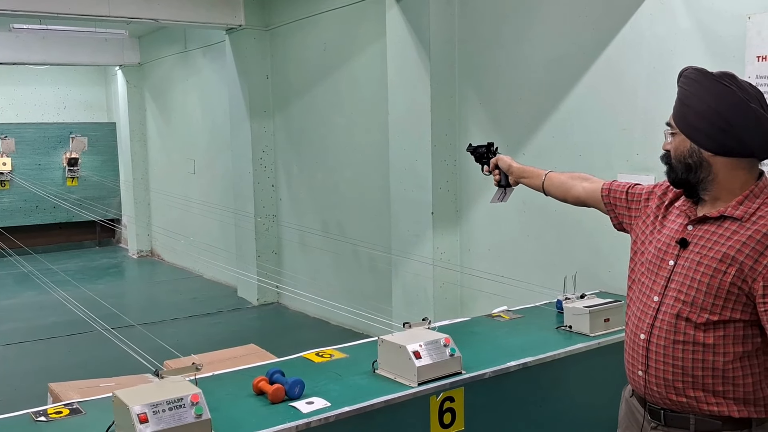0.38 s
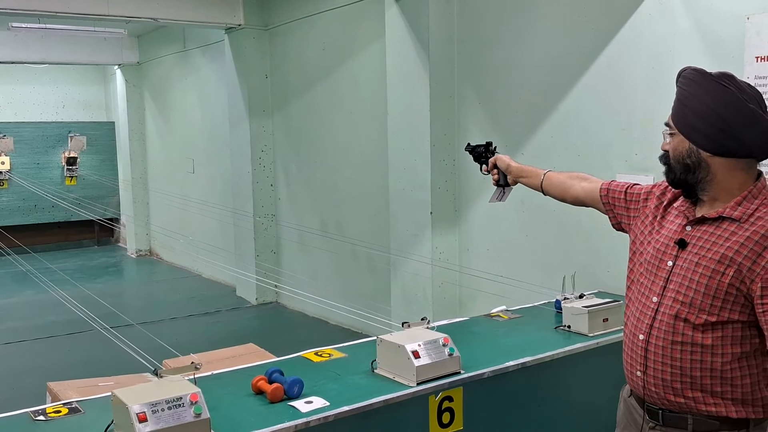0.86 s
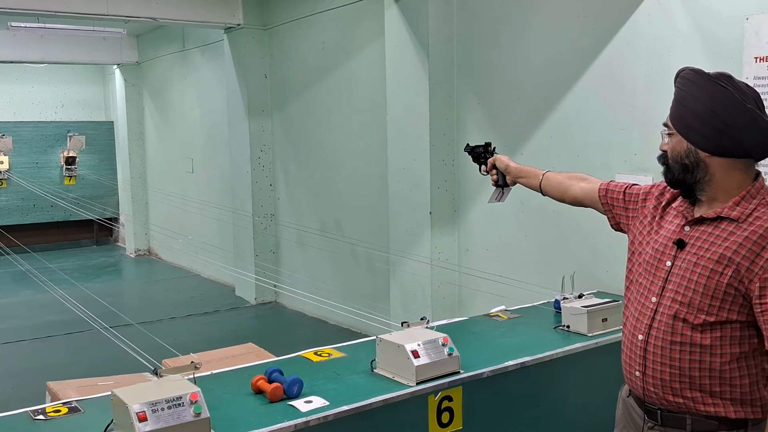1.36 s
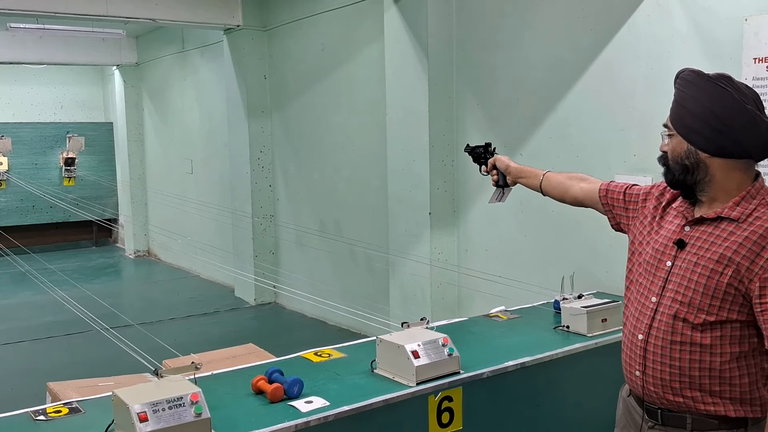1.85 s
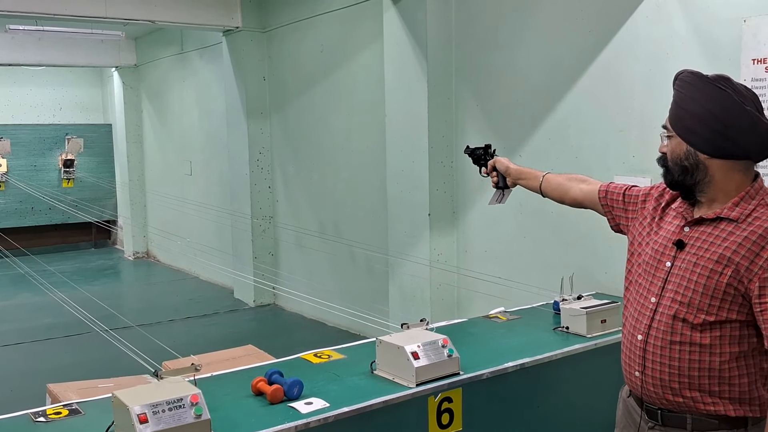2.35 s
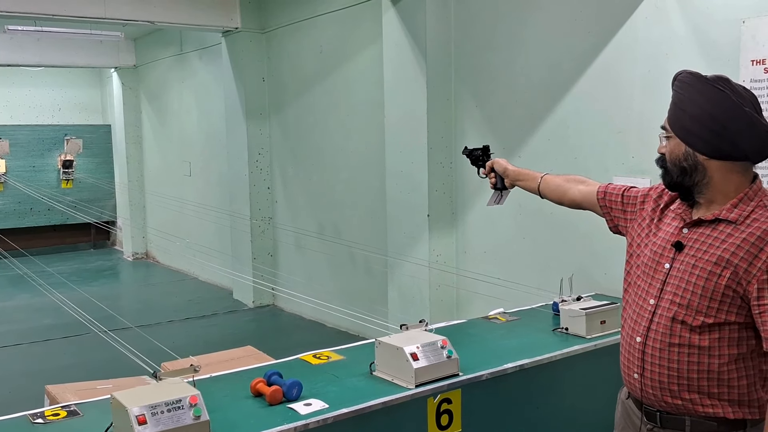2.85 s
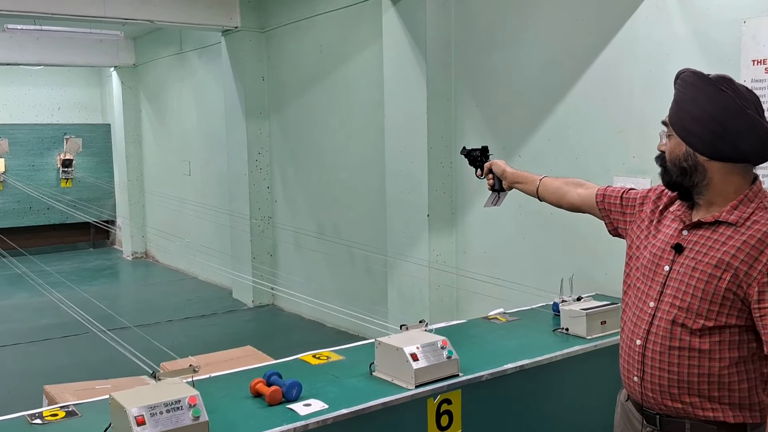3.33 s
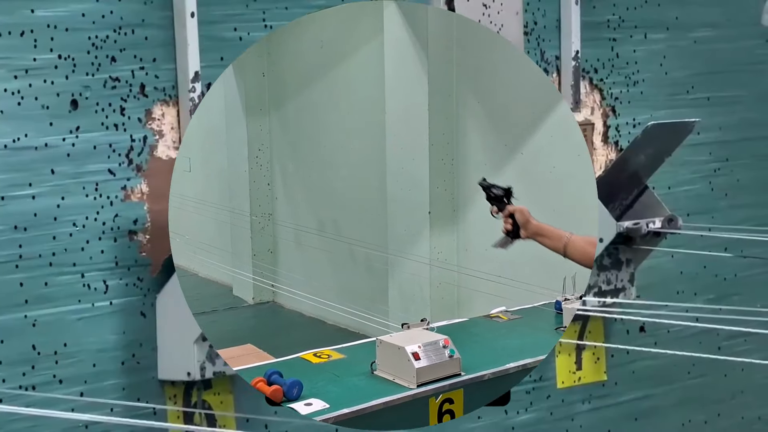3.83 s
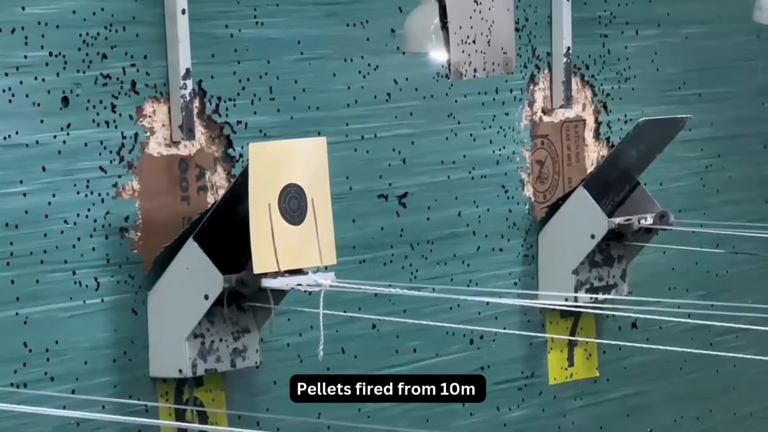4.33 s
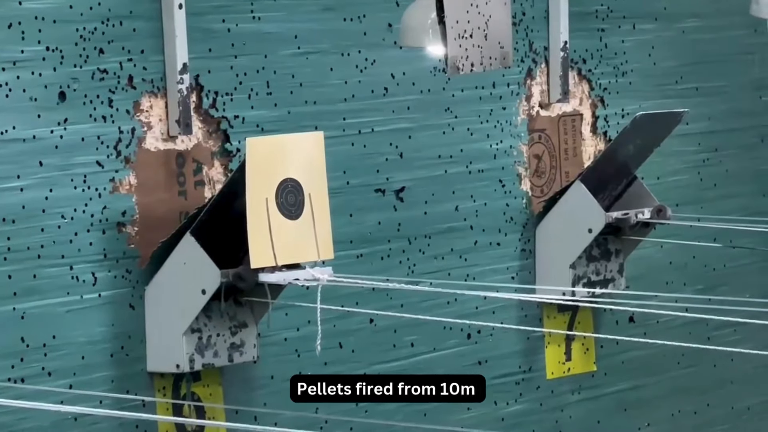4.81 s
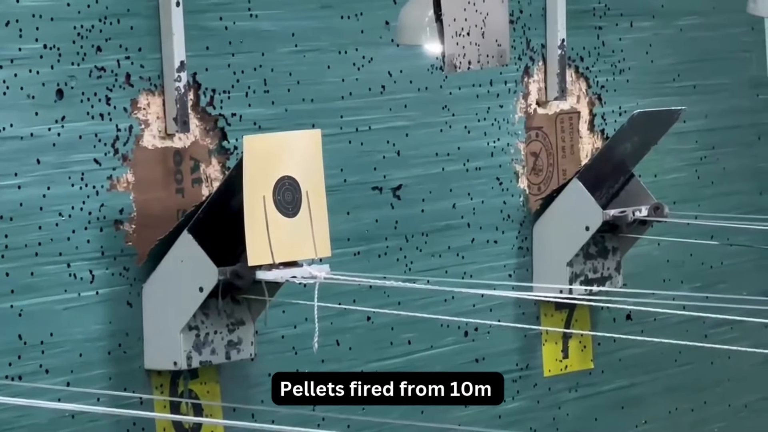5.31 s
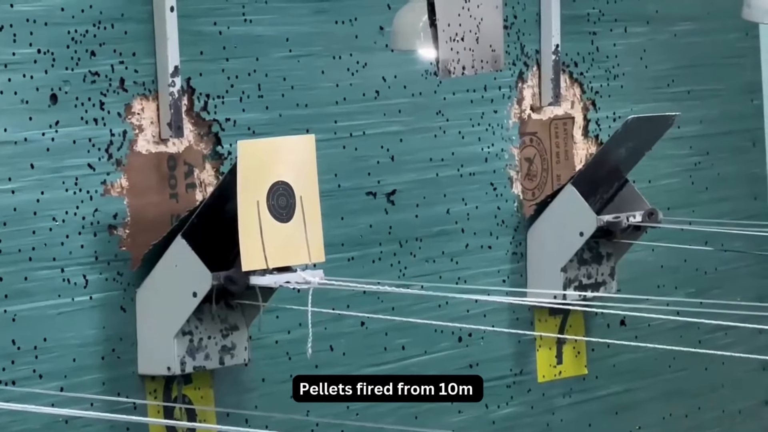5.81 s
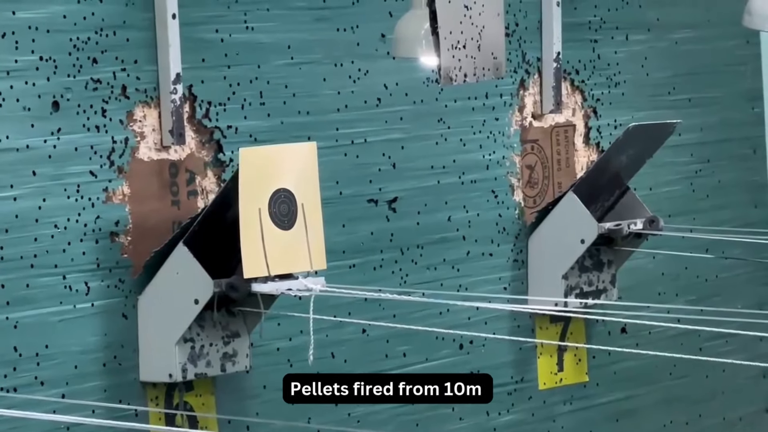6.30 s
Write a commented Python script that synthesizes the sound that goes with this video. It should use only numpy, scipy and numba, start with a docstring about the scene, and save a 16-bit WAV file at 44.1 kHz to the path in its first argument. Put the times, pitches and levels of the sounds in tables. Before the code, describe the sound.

Close at a shooter's chest in a bare indoor range, quiet low ventilation air and tiny metallic cocking clicks come first. After a pause, a sharp loud gas shot cracks, with tight hard echoes, a steel trap ringing and a hall tail dying away, and a small click within it. The sound cross-fades to duller, quieter stereo air near the targets, with barely audible rustles and a faint bump, cut off just as another shot begins.

```python
"""Indoor pellet range

First, one microphone on the shooter's chest: cocking clicks, then a gas shot (a push of air plus hiss) with
hard echoes held flat by a limiter. The pellet rings the steel trap and the hall dies away as fading noise.
Then a cross-fade to a stereo phone by the targets: duller air made of filtered noise, faint rustles, a distant
bump and the start of the next shot."""
import sys
import numpy as np
from scipy import signal
from scipy.fft import rfft, irfft
from scipy.io import wavfile
from scipy.ndimage import uniform_filter1d
from numba import njit

SR = 44100
rng = np.random.default_rng(int(sys.argv[2]) if len(sys.argv) > 2 else 0)


def volts(x):
    """Linear amplitude factor 10**(x/20) for a level x in dB, scalar or array-like."""
    e = np.asarray(x, float) / 20
    return 10 ** e


def digitize_waveform(pressure):
    """Quantize a signal to 16-bit integers and store it at the path in sys.argv[1].

    Rows of a 2-D input are taken as channels; values are limited to [-1, 1].
    """
    field = np.atleast_2d(pressure).T
    bounded = np.clip(field, -1, 1)
    quanta = np.round(bounded * 32767).astype(np.int16)
    wavfile.write(sys.argv[1], SR, quanta)


N = 294256
TIME = np.arange(N) / SR
HALL_LENGTH = int(2.5 * SR)  # samples
SOUND_M_S = 343  # speed of sound
SHOT_S, SHOT_DB = 2.5561, 3.5  # time of the shot, level of its blasts

# surfaces near the shooter (bench, boxes, floor, ceiling):
# (extra path [m], level [dB], hiss share [0-1])
NEAR_SURFACES = [(.58, 5.5, 0.4), (1.47, -3, 0.3), (2.4, 1.5, .8), (4.05, -1.5, 0.79)]


def colour(x, points):
    """Filter through (frequency [Hz], gain [dB]) points without any sound ahead of the input."""
    hz, db = np.transpose(points)
    log_gain = np.interp(np.log(np.linspace(1, SR / 2, 2049)), np.log(hz), db) * np.log(10) / 20
    # minimum phase: fold the second half of the cepstrum onto the first
    cepstrum = irfft(log_gain)
    cepstrum[1:2048] *= 2
    cepstrum[2049:] = 0
    response = irfft(np.exp(rfft(cepstrum)))
    return signal.fftconvolve(x, response)[:len(x)]


def band(x, lo_hz, hi_hz):
    """Keep what lies between two frequencies."""
    edges = [lo_hz, min(hi_hz, .45 * SR)]
    return signal.sosfilt(signal.butter(2, edges, "band", fs=SR, output="sos"), x)


def cut(x, top_hz):
    """Steep low-pass."""
    return signal.sosfilt(signal.ellip(8, .2, 60, top_hz, fs=SR, output="sos"), x)


def level(x, db):
    """Scale to an rms (average) level."""
    return x * volts(db) / np.sqrt(np.mean(x ** 2))


def add(out, s, x):
    """Mix x into out from time s."""
    i = int(round(s * SR))
    out[i:i + len(x)] += x[:len(out) - i]


def walk(rate):
    """Slow random drift with an rms size of 1; rate is how many new random values come per second."""
    k = int(SR / rate)
    steps = np.repeat(rng.standard_normal(N // k + 1), k)
    smooth = uniform_filter1d(uniform_filter1d(steps, k), k)
    return level(smooth[:N], 0)


def fade(t, t60):
    """Exponential decay that falls 60 dB in t60 seconds."""
    return np.exp(-np.log(1000) * t / t60)


def blast(hiss):
    """Muzzle blast: a dip, a sharp push of gas that swings back, and a puff of jet hiss scattered by the bench."""
    t = TIME[:300]
    dip = np.exp(-((t - .0004) / .00007) ** 2)
    push = (t > .0005) * np.cos(2 * np.pi * 600 * (t - .0006)) * np.exp(-t / 0.0011)
    puff = band(rng.standard_normal(len(t)), 2493, 15500)
    puff = puff * np.minimum(t / 0.00037, 1) * np.exp(-t / 0.0014)
    pressure = band((1 - hiss) * (1.2 * push - 1.56 * dip), 149.3, 16000)
    return pressure + 0.81 * hiss * puff


def echoes():
    """Every hard arrival of the blast: direct, off near surfaces, and to and fro between the side walls."""
    # straight to the microphone, which sits behind the muzzle: (level [dB], hiss share [0-1])
    direct = -4, 0.94
    rows = [(0.008, *direct)] + NEAR_SURFACES
    round_m, first_db, loss_db, hiss = 5.3, 6.5, 2, .45  # path and loss are for each round
    copy_m, copy_db = .8, -3  # the bench's copy comes this much later and weaker
    for k in (1, 2, 3):
        db = first_db - loss_db * (k - 1)
        rows += [(k * round_m, db, hiss), (k * round_m + copy_m, db + copy_db, hiss)]
    return rows


def slaps():
    """Scattered hard copies of the blast, as off pillars and beams, that roughen the hall tail."""
    # settings: rate [per second], level [dB], size spread [dB], 60 dB fall time [s]
    rate, db, spread_db, t60 = 704, -15, 3, 0.95
    t = TIME[:int(1.5 * SR)]
    when, size, sign = rng.random((len(t), 3)).T
    strength = volts(db - spread_db * np.log(1 - size)) * np.sign(sign - .5)
    train = (when < rate / SR) * strength
    train = train * fade(t, t60) * (1 - np.exp(-t / .03))
    return signal.fftconvolve(train, band(blast(0.22), 700, 9000))


def hall(build_s):
    """Diffuse hall response: dense reflections that build up, each third of an octave dying at its own rate."""
    # hall decay: (frequency [Hz], 60 dB fall time [s])
    decay = [(60, 2.3), (160, 1.52), (420, 2.14), (1100, 1.004), (2900, 1.27), (6000, 1.173), (10000, 0.7),
             (16000, 0.7)]
    hz, t60 = np.transpose(decay)
    t = TIME[:HALL_LENGTH]
    spectrum = rfft(rng.standard_normal(len(t)))
    octave = np.log2(np.linspace(1, SR / 2, len(t) // 2 + 1))
    out = 0
    for centre in np.arange(15, 44) / 3:
        # triangular slices that overlap and add up to the whole
        share = np.clip(1 - 3 * abs(octave - centre), 0, 1)
        out = out + irfft(spectrum * share, len(t)) * fade(t, np.interp(centre, np.log2(hz), t60))
    return out * (1 - np.exp(-t / build_s))


def ring(modes, blur_hz):
    """Ringing steel or hall air; each mode is narrow noise, wavering as its reflections beat against it."""
    t = TIME[:2 * SR]
    out = 0
    for hz, db, t60 in modes:
        # reversed: at full swing from the first moment
        beat = band(rng.standard_normal(len(t)), hz - blur_hz, hz + blur_hz)[::-1]
        out = out + volts(db) * fade(t, t60) * level(beat, -2.3)
    return out


def shot_tail():
    """The diffuse hall answer to the shot, scaled by its early part."""
    # colour of the shot in the hall: (frequency [Hz], gain [dB])
    tail_colour = [(29, -63.5), (55, -29.5), (95, -28), (125, -15), (223, -12), (371, -10.5), (507, -10),
                   (863, -2), (1500, -6.5), (1900, -7.5), (2440, -8), (3700, -9), (5270, -14.5),
                   (8000, -14.5), (13000, -10.5), (16000, -19.5)]
    tail = colour(hall(build_s=0.041), tail_colour)
    return volts(-7.5) * tail / np.std(tail[1000:6000])


def trap():
    """The pellet sets the steel trap ringing; the ring swells in quickly and each mode dies at its own rate."""
    # steel trap modes: (frequency [Hz], level [dB], 60 dB fall time [s])
    steel = [(609.7, 0, 1.4), (739, -2.5, 1.6), (955, 0, 1.1), (1671, 0, 1.1), (2250, -1, 1.3),
             (2410, -7.5, 0.56), (2450, 2, 1.15), (2700, -5, 0.71), (3000, -8.5, 1.1), (3510, -4.5, .8),
             (5140, -7, 1.0), (7000, -10, .9), (8027, -6, 0.82)]
    return volts(-20.5) * ring(steel, blur_hz=17) * (1 - np.exp(-TIME[:2 * SR] / 0.015))


def standing_waves():
    """The shot excites tones of the hall air, which build up and then die away."""
    # standing waves of the hall: (frequency [Hz], level [dB], 60 dB fall time [s])
    tones = [(122, -6, 2.2), (150.8, -8.5, 2.2), (196.1, -3.5, 2.4), (264, 1, 2), (333, -3, 2.2),
             (444.3, -1, 2.4), (481.3, -1.5, 2.2), (552, -3, 2.4), (675, -2.5, 1.6)]
    return volts(-22) * ring(tones, blur_hz=5) * (1 - np.exp(-TIME[:2 * SR] / .03))


def shot():
    """Muzzle blast, its first echoes, the hall behind it and the pellet on the trap."""
    out = np.zeros(N)
    for path, db, hiss in echoes():
        add(out, SHOT_S + path / SOUND_M_S, volts(SHOT_DB + db) * blast(np.clip(hiss, 0, 1)))
    add(out, SHOT_S, shot_tail())
    add(out, SHOT_S, volts(SHOT_DB) * slaps())
    add(out, 2.66, trap())
    add(out, SHOT_S, standing_waves())
    return out


def mechanism():
    """Hammer, sear and trigger tick as knocks and noise snaps; a spring rings; near surfaces answer in the treble."""
    # clicks: (time [s], relative level [dB], bright share [0-1])
    clicks = [(.2775, -39, .9), (0.2847, -30, 0.5), (.339, -37, .8), (2.5482, -35, .6),
              (3.2306, -18.5, 0.49)]
    # the gun frame knocked: (frequency [Hz], level [dB])
    frame = [(3300, -9), (4350, 1.5), (5900, -6)]
    # steel spring let go as the hammer is cocked: (frequency [Hz], level [dB], 60 dB fall time [s])
    spring = [(10450, -3.5, 0.58), (10540, -4.5, 0.17), (15290, -23, .25)]
    # floor and ceiling send back the treble of each click: one level [dB] each
    click_echo_db = -3.5, -9
    out, snaps = np.zeros((2, N))
    lead_s = .002  # the knock is centred this long after its first sample
    t = TIME[:180] - lead_s
    knock = 0
    for hz, db in frame:
        knock = knock + volts(db) * np.sin(2 * np.pi * hz * t) * np.exp(-(t * hz / 4.4) ** 2)
    for s, db, bright in clicks:
        snap = band(rng.standard_normal(len(t)), 2200, 14000) * np.exp(-(t / 0.00056) ** 2)
        add(out, s - lead_s, volts(db) * (1 - bright) * knock)
        add(snaps, s - lead_s, volts(db) * bright * level(snap, -9))
    treble = band(snaps, 10000, 16000)
    for (path, _, _), db in zip(NEAR_SURFACES[2:], click_echo_db):
        add(out, path / SOUND_M_S, volts(db) * treble)
    add(out, .2768, volts(-42.5) * ring(spring, blur_hz=45))
    walls = band(hall(build_s=.004), 7500, 17000) * fade(TIME[:HALL_LENGTH], 0.98)
    return out + snaps + volts(-29.5) * signal.fftconvolve(snaps, walls)[:N]


@njit
def limiter(x, top, attack, release, ceiling):
    """Gain falls fast while the level is over top and recovers slowly; what slips through clips softly."""
    y, envelope = np.zeros(len(x)), top
    for i in range(len(x)):
        target = max(abs(x[i]), top)
        envelope += (target - envelope) * (attack if target > envelope else release)
        v = x[i] * top / envelope / ceiling
        y[i] = ceiling * v / (1 + v ** 4) ** .25
    return y


def hum():
    """A low steady tone whose level drifts."""
    return volts(-64.5 + 4 * walk(6)) * np.sin(2 * np.pi * 104.5 * TIME)


def lapel():
    """The mono microphone at the shooter's chest, with its limiter."""
    # hall air at the lapel: (frequency [Hz], gain [dB])
    air_colour = [(15, -30), (25, -3), (48, -1.5), (70, -8.5), (99, -1), (161, -6.5), (236, -2.5),
                  (285, -8), (394, -4), (463, -4.5), (887, -4.5), (1250, -9), (1750, -12.5), (3000, -20),
                  (8830, -36), (16000, -47)]
    heard = air(air_colour, -45, .6 * walk(8.1)) + hum() + mechanism() + shot()
    # attack 1.5 ms, release 33 ms
    return limiter(heard, 0.75, 1 / (0.0015 * SR), 1 / (0.033 * SR), 0.93)


def next_shot():
    """Each arrival of the next shot is a short ringing pulse at each port's pitch, softened ahead of its peak."""
    # arrivals: (time of peak [s], level [dB], left minus right [dB])
    arrivals = [(6.6573, -10, -4.5), (6.6600, -13, -4), (6.6657, -12.5, -1), (6.671, -13, -9)]
    # pulse of each port, left then right: (frequency [Hz], softening ahead of the peak [s], fall time [s])
    port_pulses = [(1300, 0.00064, 0.0013), (1510, 0.0021, .0008)]
    out = np.zeros((2, N))
    lead_s = .01  # room for the softening ahead of each peak
    t = TIME[:800] - lead_s
    for port, sign, (hz, softening, fall) in zip(out, (1, -1), port_pulses):
        envelope = np.exp(-np.where(t < 0, -t / softening, t / fall))
        pulse = envelope * np.cos(2 * np.pi * hz * t)
        for s, db, pan_db in arrivals:
            add(port, s - lead_s, volts(db + sign * pan_db / 2) * pulse)
    return out


def add_wash(mid, side):
    """Mix in the wash of dense reflections behind the next shot, coloured apart for mid and side."""
    # colour of the middle of the wash: (frequency [Hz], gain [dB])
    mid_colour = [(47, -39.5), (80, -6.5), (170, -3.5), (400, -12), (1000, -10.5), (1510, -4.5),
                  (5140, -14.5), (7420, -22), (9480, -17.5), (10500, -31.5), (13600, -59), (22000, -120)]
    # colour of its left-right difference: (frequency [Hz], gain [dB])
    side_colour = [(88, -52), (150, -22.5), (1170, -4), (3260, -22), (3850, -44.5), (5660, -50),
                   (7590, -17.5), (12000, -30), (15600, -59.5), (22000, -120)]
    for part, points, db in (mid, mid_colour, -18.5), (side, side_colour, -19.5):
        add(part, 6.6558, level(colour(hall(build_s=0.00062)[:800], points), db))


def bump():
    """A dull bump far off: a low band of the hall's fading noise."""
    thud = band(hall(build_s=0.015), 247, 470) * fade(TIME[:HALL_LENGTH], 2.818)
    return level(thud, -63)


def rustle():
    """Faint rustles by the targets: noise that swells and sinks."""
    # rustles: (time of peak [s], level [dB], length to each side [s])
    rustles = [(5.0, -76, .07), (5.55, -76.5, .25)]
    out = np.zeros(N)
    for s, db, length in rustles:
        noise = level(band(rng.standard_normal(N), 1500, 4905), 0)
        out += volts(db) * noise * np.exp(-((TIME - s) / length) ** 2)
    return out


def phone():
    """Two ports by the targets: mid and side add in the left, subtract in the right; the next shot joins each."""
    # bass below 130 Hz, only its changes count: (time [s], level [dB])
    rumble = [(4.0, -59.5), (5.1, -61), (5.5, -57.5), (5.9, -57), (6.4, -62), (6.62, -57)]
    # air in the middle: (frequency [Hz], gain [dB])
    mid_colour = [(13, -32), (22, -10), (49, 1), (147, -5.5), (211, -5.5), (281, -11), (461, -12.5),
                  (1120, -21), (1690, -22.5), (3160, -36.5), (5310, -44), (7450, -60), (11000, -54),
                  (14300, -97), (22000, -120)]
    # air in the left-right difference: (frequency [Hz], gain [dB])
    side_colour = [(24, -44), (40, -13), (195, -3.5), (977, -7), (1540, -5.5), (3030, -34.5), (3980, -48),
                   (6550, -58), (7510, -34), (9000, -63), (11700, -91), (19800, -120)]
    rumble_db = np.interp(TIME, *np.transpose(rumble))
    rumble_db = rumble_db - rumble_db[N // 2:].mean()
    mid = air(mid_colour, -52.5, rumble_db) + rustle()
    side = air(side_colour, -61.5, rumble_db)
    add(mid, 5.03, bump())
    add_wash(mid, side)
    return np.array([mid + side, mid - side]) + next_shot()


def air(points, db, bass_db):
    """Ventilation hiss and building rumble as coloured noise; only the bass moves."""
    low = band(rng.standard_normal(N), 8, 130) * volts(bass_db)
    high = band(rng.standard_normal(N), 130, 19000)
    return level(colour(low + high, points), db)


def scene():
    """Cross-fade: the lapel sinks, the phone rises, both done at the same moment."""
    lapel_out_s, phone_in_s, end_s = 3.105, 3.59, 4.025
    near = np.clip((end_s - TIME) / (end_s - lapel_out_s), 0, 1) ** 0.77  # bent fall
    far = np.clip((TIME - phone_in_s) / (end_s - phone_in_s), 0, 1)
    return volts(-3) * near * lapel() + far * cut(phone(), 10600)


def roll_off(x):
    """The treble ends steeply here."""
    return signal.sosfilt(signal.butter(12, 16960, fs=SR, output="sos"), x)


def record(dry):
    """The finished mix loses its top treble."""
    mix = cut(dry, 15750)
    return roll_off(mix)


dry = scene()
out = record(dry)
digitize_waveform(out)
```